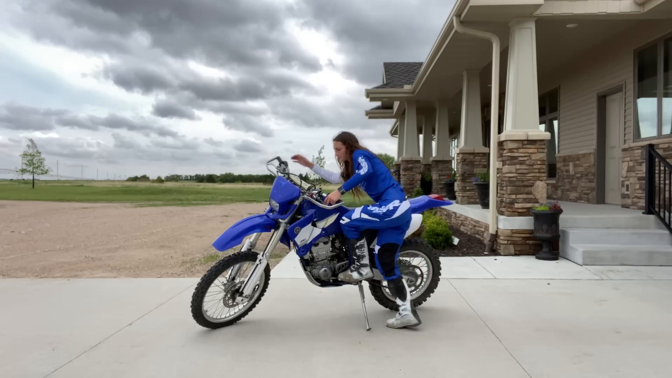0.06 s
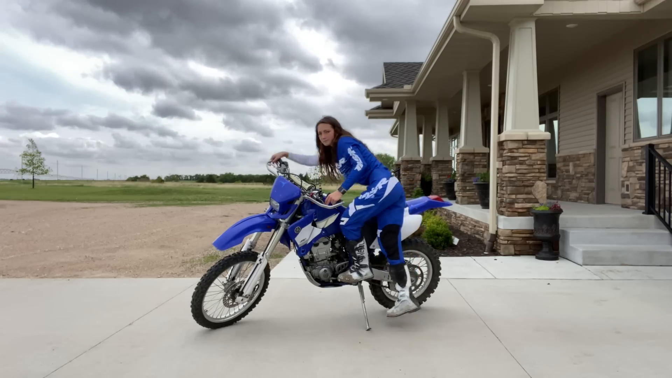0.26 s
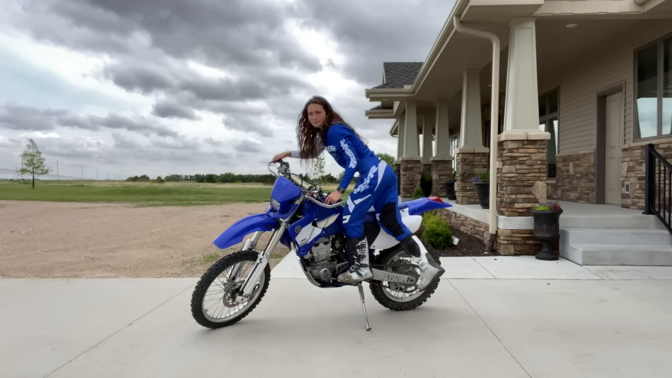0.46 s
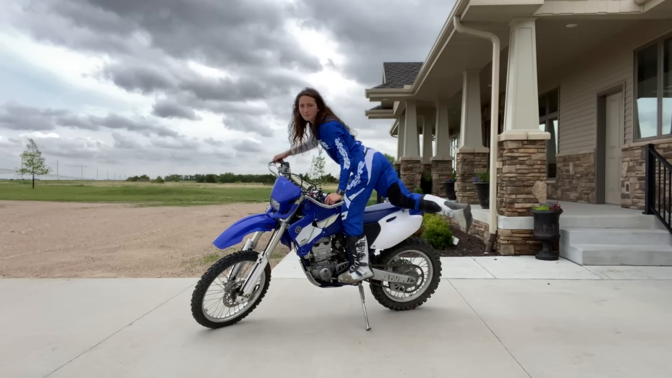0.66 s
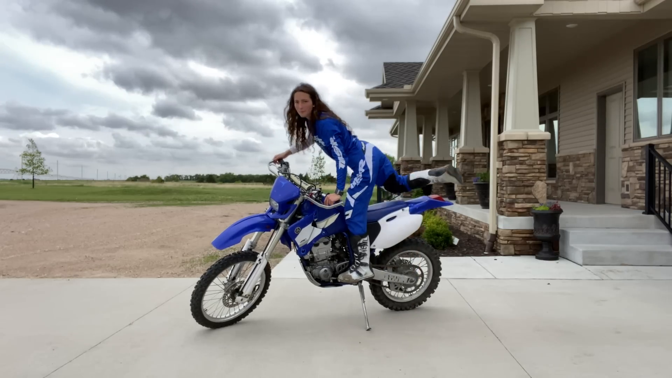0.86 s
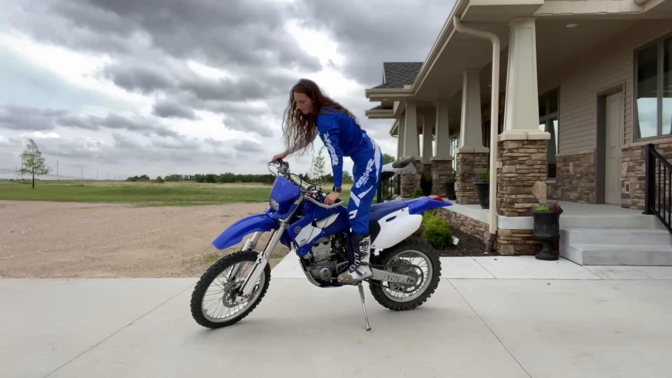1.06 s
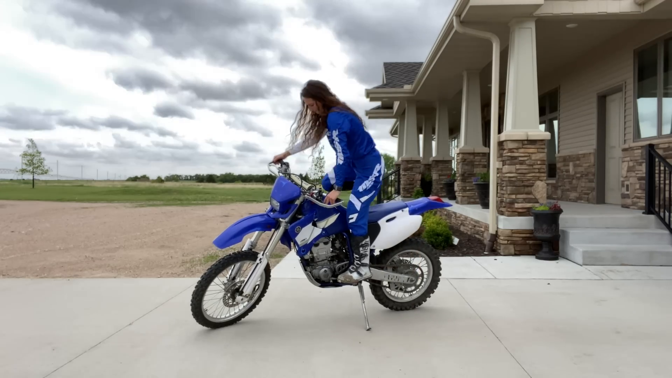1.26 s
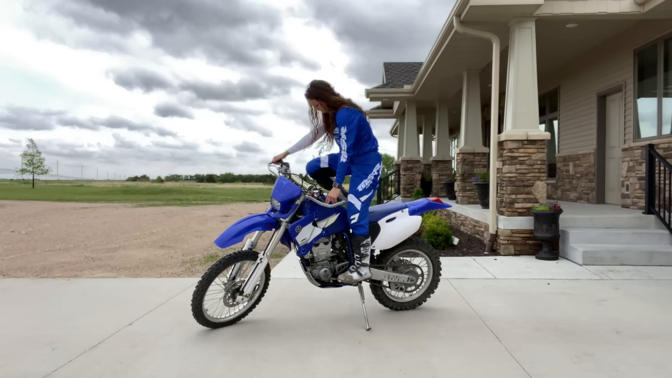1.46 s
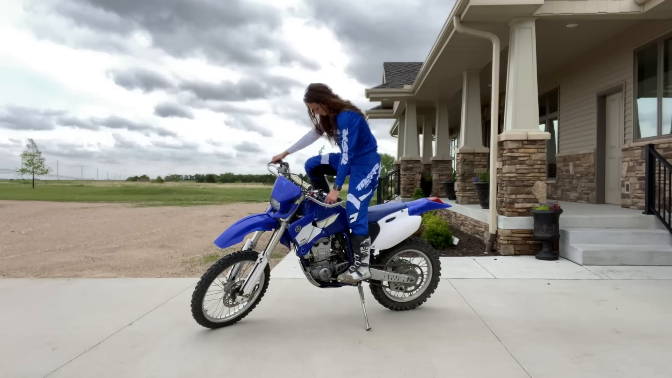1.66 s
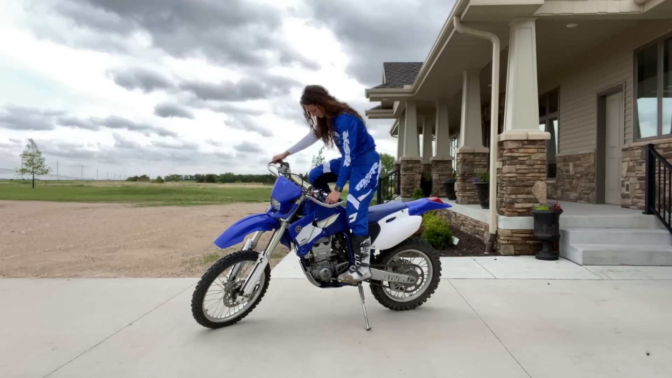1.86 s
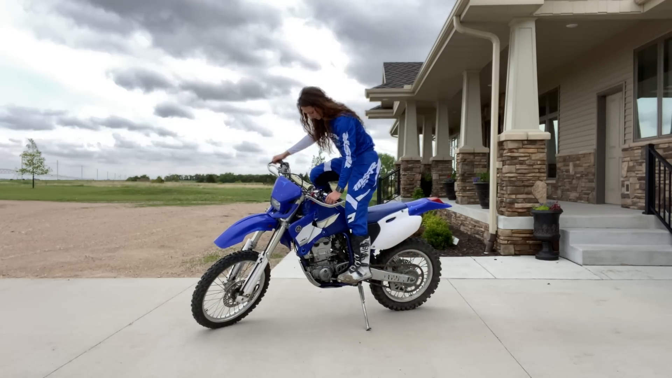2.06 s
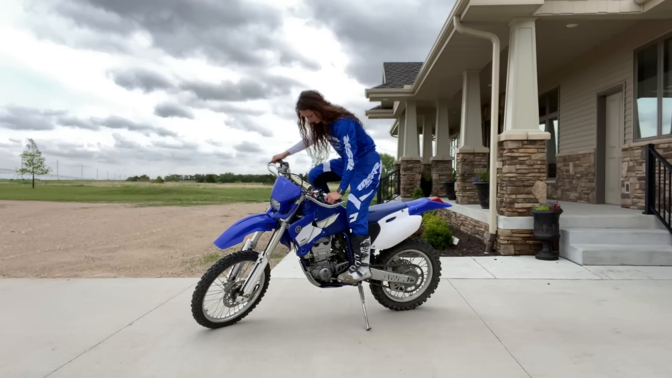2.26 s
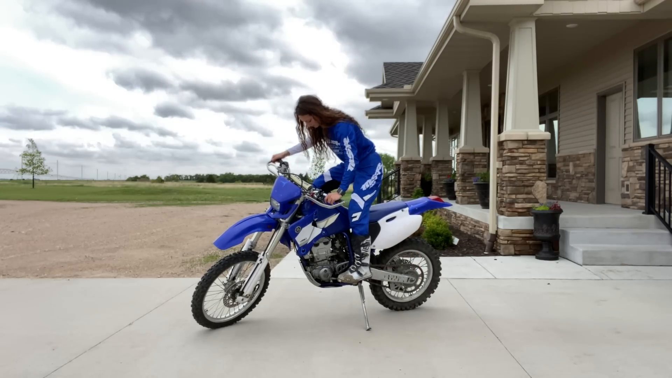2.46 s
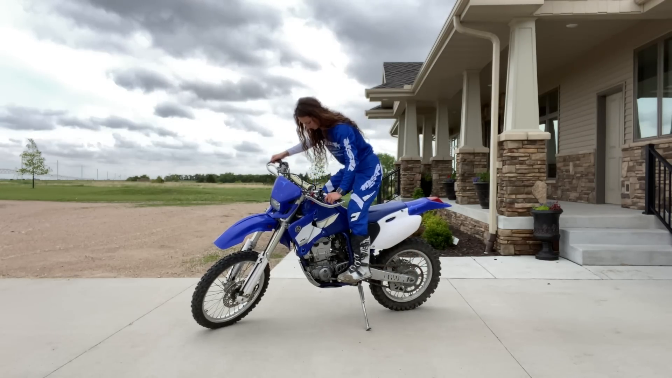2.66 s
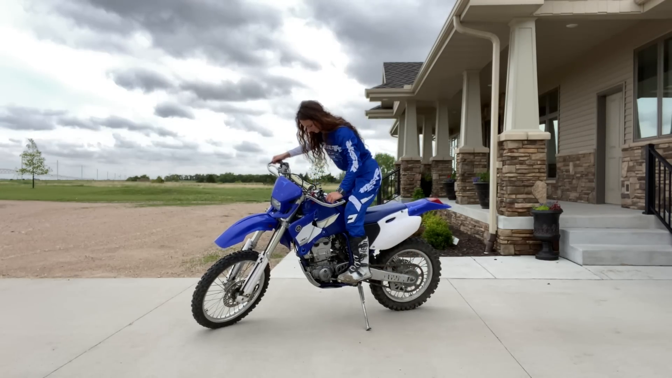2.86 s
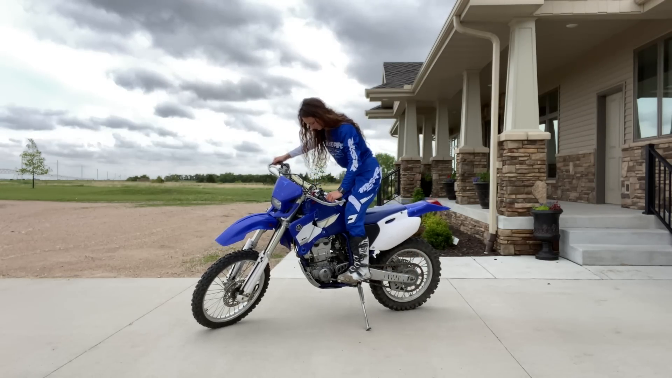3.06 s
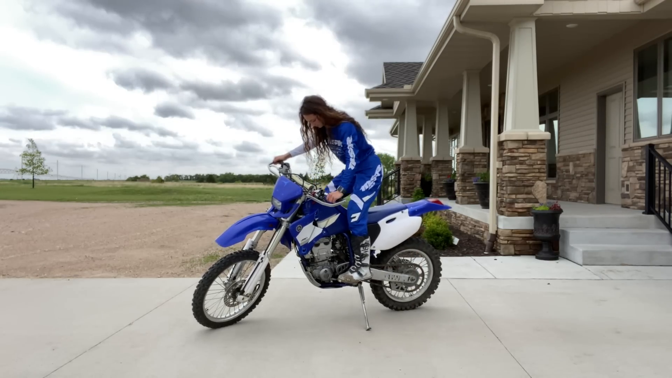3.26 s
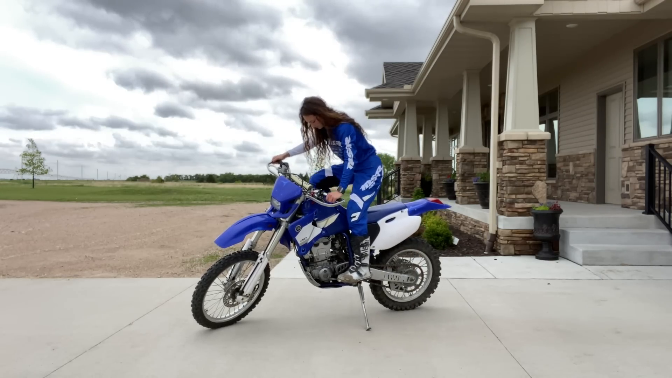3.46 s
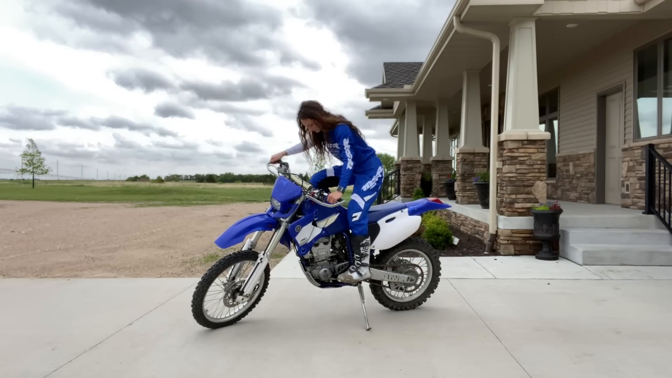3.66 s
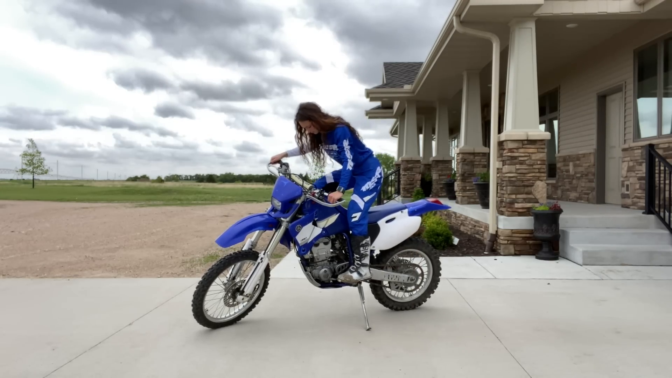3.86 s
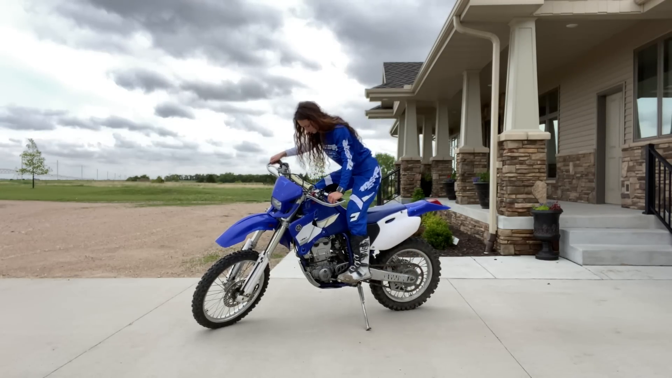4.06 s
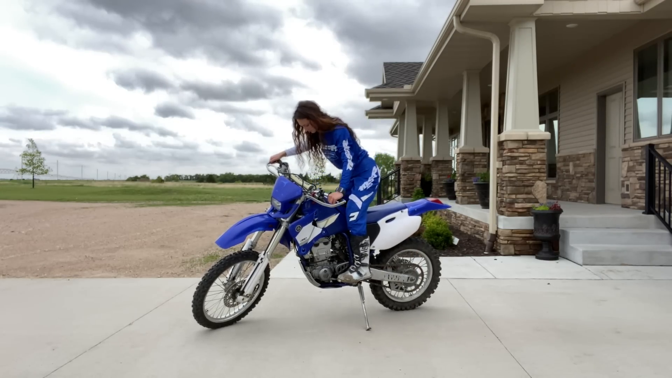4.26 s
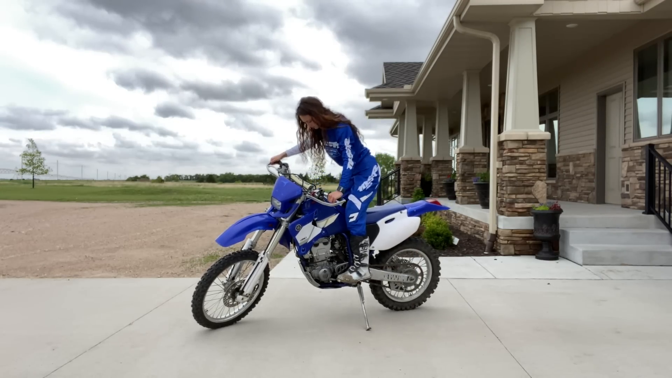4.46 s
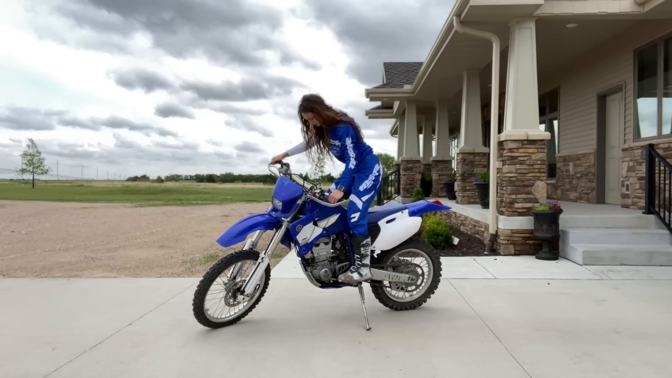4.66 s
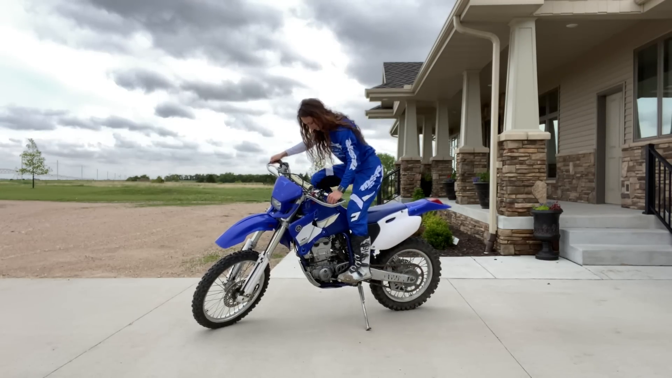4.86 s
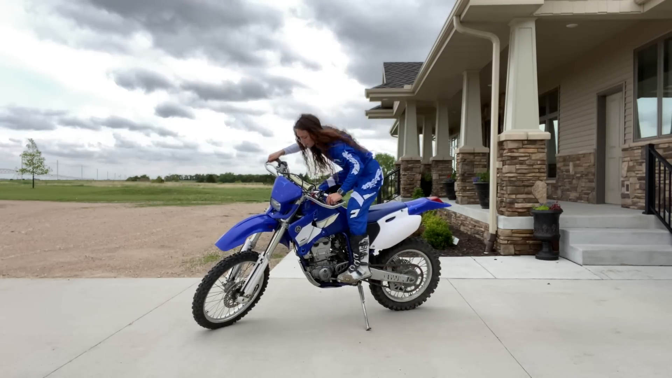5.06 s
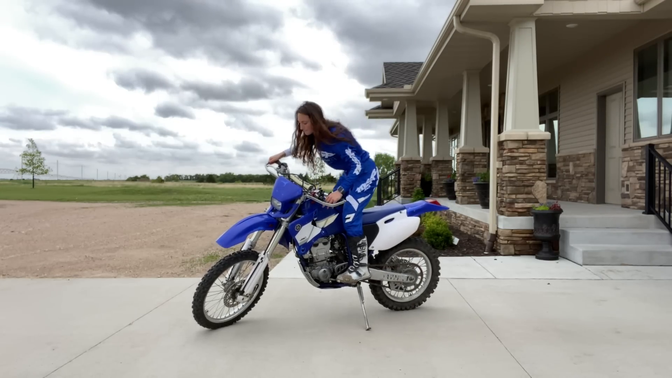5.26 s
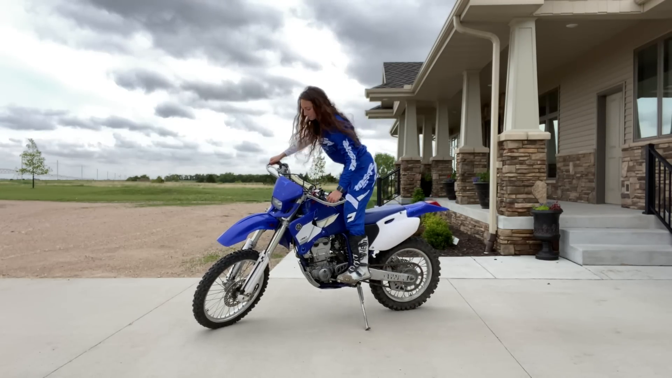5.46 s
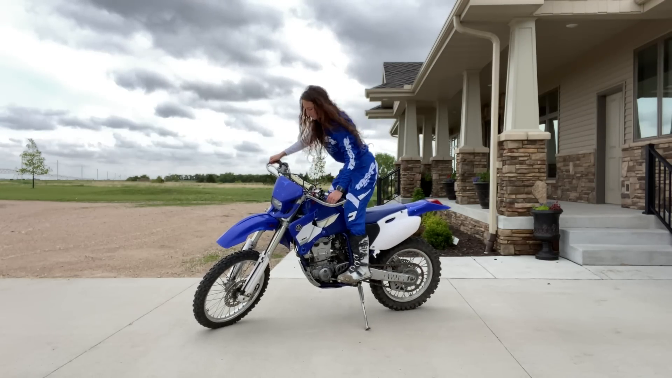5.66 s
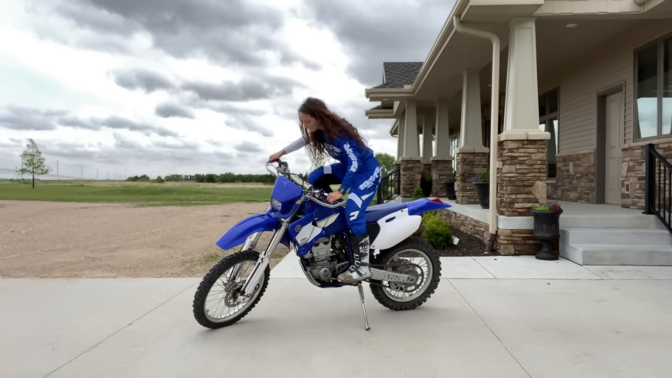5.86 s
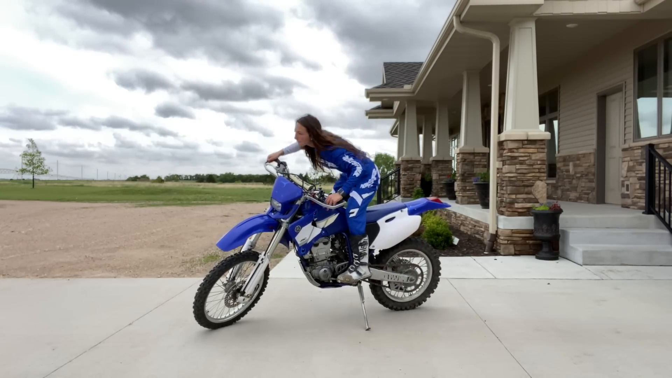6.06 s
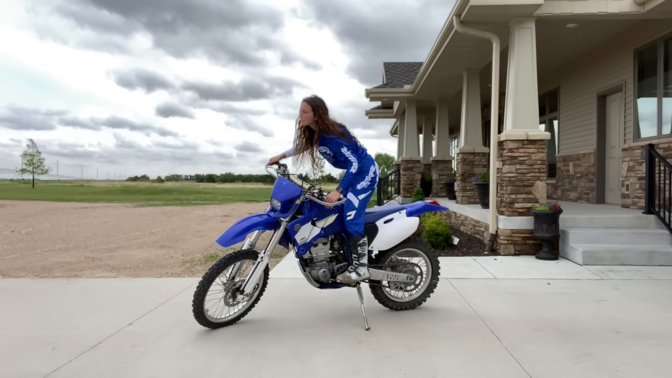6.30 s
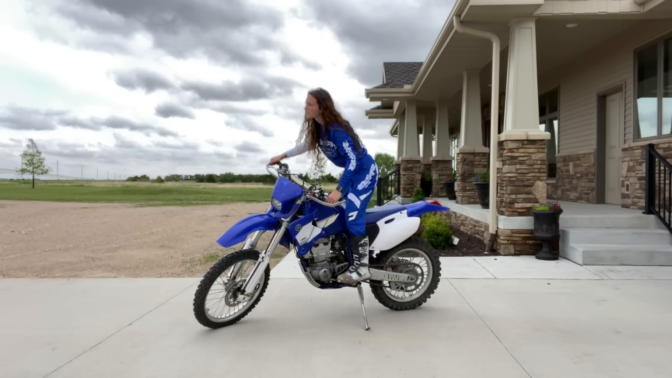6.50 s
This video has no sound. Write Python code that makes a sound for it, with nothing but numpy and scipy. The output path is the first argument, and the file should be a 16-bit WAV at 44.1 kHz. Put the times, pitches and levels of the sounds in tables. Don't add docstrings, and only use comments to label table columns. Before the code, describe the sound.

Quiet open yard by a house, light wind. Small boot ticks, rubbing cloth and dull thuds as someone settles on a motorcycle, then a moderate lever slam with a soft puff. Slow ratchet clicks follow, then a second stamp, a longer run of clicks, and two heavy stamps with booming puffs, bright clanks and rattling. Short echoes return from the wall; the phone microphone rounds the loudest peaks. No ignition.

```python
import sys
import numpy as np
from scipy import signal
from scipy.fft import rfft, irfft, next_fast_len
from scipy.io import wavfile
from scipy.ndimage import uniform_filter1d

SR = 44100
rng = np.random.default_rng(int(sys.argv[2]) if len(sys.argv) > 2 else 0)


def digitize_waveform(pressure):
    field = np.atleast_2d(pressure).T
    bounded = np.clip(field, -1, 1)
    quanta = np.round(bounded * 32767).astype(np.int16)
    wavfile.write(sys.argv[1], SR, quanta)


def gain_from_decibels(decibels):
    exponent = np.asarray(decibels, float) / 20
    return 10 ** exponent


N = 287973
LEAD, SPAN = int(0.033 * SR), int(0.32 * SR)

# t/s, peak/dB, dull part/dB, bright part/dB
STOPS = [
    (2.8418, -15, -8.5, -3.5),
    (4.3129, -18.5, -4.5, 1),
    (5.198, -9.5, -4.5, 0),
    (6.1298, -10.5, -3, 1),
]
# f/Hz, level/dB, t60/s
STOP_MODES = [(512, -7.5, 0.018), (685, -7.5, 0.028), (1200, -7, 0.024), (1390, -8, .025),
              (1600, -8, 0.016), (1933, -5.5, 0.026), (2134, -10, .03), (2550, -2.5, 0.019),
              (3486, -13, 0.022), (4290, -13, 0.0083), (6080, -16, 0.015), (6460, -14, .02),
              (7930, -8, .015), (8180, -7, 0.021)]
# t/s, peak/dB, dull part/dB, bright part/dB
CLANKS = [(2.36, -52.5, 17, -23), (2.3815, -54.5, 17.5, -32), (2.7683, -32.5, 2.5, 11),
          (2.9012, -35.5, 9, 8), (3.6975, -45.5, 9, -29), (4.2547, -31.5, -24, 10), (4.2946, -38, -7, -8),
          (4.3485, -23, -1.5, -9), (5.003, -17, -10, -10), (5.03, -23, -1.5, -8.5), (5.1612, -37, -11, 19),
          (5.2865, -34.5, 7, -8), (5.3167, -30, -27.5, -34), (5.3389, -34, 6, -24.5),
          (5.9569, -22.5, 0, -8.5), (6.048, -43.5, 5, 2), (6.094, -42, -12, 20.5), (6.185, -22, -19, -3.5),
          (6.4093, -45, 6, -25)]
# f/Hz, width/Hz, level/dB
LEVER_MODES = [(522, 50, -12.5), (1183, 110, -10.5), (1610, 64, -26), (2180, 49, -2), (2440, 100, 2),
               (3540, 110, -1), (4100, 56, -2.5), (5400, 120, -9.5), (6230, 74, -29.5), (6550, 30, -13.5),
               (6850, 140, 5.5), (8300, 70, -22.5)]
# f/Hz, level/dB
CRACK = [(180, -30.5), (300, -14.5), (587, -4), (848, -13), (1960, -4.5), (2210, -17.5), (2570, -3),
         (4770, -4), (7890, -6.5), (9330, -6), (10500, -12.5), (13500, -14.5), (16500, -55)]
# t/s, peak/dB, low mode/dB, high mode/dB, click/dB
RATCHET = [(3.1712, -33, -6.5, 2, -1.5), (3.2249, -30.5, -6.5, -2, -8), (3.2817, -32.5, -7.5, 0, -5),
           (3.3431, -36, -2.5, 0, 4), (3.4098, -31.5, -8.5, -3, -3), (3.4804, -31.5, -4.5, -1, -8),
           (4.4317, -33, -2, 5.5, -3), (4.4984, -27, -9, -13, -17), (4.5466, -28, -6.5, -5, -13),
           (4.5923, -31.5, -4.5, 0, -3), (4.6401, -28.5, -7, 0.5, -18), (4.6937, -31, -8.5, -2, -5.5),
           (4.7505, -32, -6.5, -3, -0.5), (4.809, -30, -11, -0.5, -4), (4.8674, -29.5, -8, 0, -2.5),
           (4.9204, -38.5, -4, -2, -10.5), (5.6789, -33.5, -3, 4, -1), (5.731, -29, -7.5, -8, -5),
           (5.7755, -32, -7.5, 0.5, 1), (5.8186, -32.5, -5.5, -8, 3.5), (5.8611, -35, 0, 3.5, 2.5)]
# f/Hz, t60/s
PAWL_RINGS = [(1750, .022), (1160, .026), (2420, .017)]
# t/s, peak/dB, t60/s
PUFFS = [(2.706, -33, 0.25), (2.784, -27.5, 0.44), (2.868, -30.5, 0.13), (4.227, -33, 0.13),
         (4.266, -23, 0.53), (4.279, -36, 0.27), (4.321, -27.5, 0.2), (5.075, -27, 0.066),
         (5.102, -21, 0.088), (5.115, -8, 0.42), (5.173, -27, 0.14), (5.205, -17.5, 0.38), (5.267, -24, .4),
         (6.059, -26, 0.082), (6.073, -14, 0.067), (6.097, -5.5, 0.29), (6.131, -16.5, 0.18),
         (6.186, -23, .3), (6.237, -38.5, 0.24)]
# start/s, fastest/s, coasted out/s, level/dB
STROKES = [
    (2.62, 2.8, 3.05, -48),
    (4.13, 4.27, 4.48, -43.5),
    (4.99, 5.18, 5.31, -39),
    (5.88, 6.11, 6.333, -39),
]
# start/s, middle/s, end/s, level/dB
RETURNS = [
    (3.16, 3.4, 3.53, -59),
    (4.42, 4.6, 4.98, -57.5),
    (5.71, 5.84, 5.9, -54),
]
# start/s, peak/s, end/s, level/dB
CLOTH = [(0, .06, 0.12, -58), (.18, .22, 0.21, -55), (.26, .38, 0.55, -66.5), (.58, .7, .8, -64),
         (.74, .86, 0.96, -65.5), (.93, 1.04, 1.11, -62.5), (1.1, 1.2, 1.34, -67.5),
         (1.28, 1.4, 1.62, -69.5), (2.14, 2.17, 2.24, -65), (5.38, 5.44, 5.56, -62), (5.5, 5.57, 5.67, -66)]
# start/s, peak/s, end/s, level/dB
CREAKS = [(.04, .11, 0.098, -64), (1.09, 1.13, 1.203, -63), (2.28, 2.38, 2.57, -60.5),
          (3.5, 3.56, 3.74, -64), (3.67, 3.73, 3.83, -54.5), (3.99, 4.04, 4.14, -73),
          (4.98, 5.04, 5.13, -48), (5.9, 5.96, 6.26, -48), (6.35, 6.4, 6.54, -64), (3.1, 3.2, 3.33, -62.5),
          (5.5, 5.6, 5.42, -69.5), (5.1, 5.25, 5.4, -49)]
# level/dB, drop to the ends/dB, lag/s
STROKE_MIX = [
    (2, 17.5, 0.013),
    (-0.5, 10.5, 0.0037),
    (-7.5, 21, 0.015),
]
RETURN_MIX = [
    (-1.7, 7.5, 0.011),
    (0.58, 1.1, 0),
    (.5, 6.1, 0.009),
]
CLOTH_MIX = [
    (-14, 5.4, 0.025),
    (-0.5, 6.9, 0),
    (-9.5, 2.6, 0.0096),
]
CREAK_MIX = [
    (9, 22.9, 0.0028),
    (0.5, 14, -0.0065),
    (-14, 17, -0.0011),
]
# t/s, level/dB
RUMBLE = [(0, -58), (.12, -63.5), (.5, -78), (.8, -71), (1.25, -73), (1.75, -64.5), (2.25, -63), (2.5, -53),
          (2.7, -51), (3.1, -55), (3.75, -53), (4.0, -54), (5.0, -55), (5.243, -40.5), (5.65, -59.5),
          (5.98, -42), (6.15, -33.5), (6.53, -58)]
# f/Hz, width/Hz, level/dB
CASES = [(510, 90, -9.5), (1178, 40, -5.5), (1700, 290, -1.5), (2410, 170, -5), (2880, 73, -10)]
# f/Hz, level/dB
HISS = [(1760, -57.5), (3000, -2.5), (3360, -3), (6570, -11.5), (7910, -8), (9060, -14), (9390, -44),
        (10500, -8.5), (13000, -23), (16500, -85.5)]
# t/s, peak/dB, f/Hz, t60/s
PINGS = [(.052, -49, 1240, .03), (.066, -57, 1314, .02), (.098, -51.5, 330, .05), (.34, -64, 1200, .03),
         (.36, -62, 2800, .03), (2.358, -39, 1170, 0.047), (2.378, -39, 1150, 0.049),
         (2.42, -45, 1200, 0.038), (3.17, -45, 199, 0.09), (4.944, -42, 700, 0.037), (2.39, -45, 280, .08),
         (2.43, -47, 418, .06), (3.555, -47.5, 700, .05), (3.7, -44, 650, .04), (3.735, -50, 2400, .03),
         (4.03, -49, 1004, 0.094), (5.05, -32, 3130, 0.033), (5.33, -40, 2990, .06),
         (5.28, -34.5, 298, .08), (5.06, -34, 330, .06), (4.056, -50, 1450, .04), (4.183, -44, 1600, .03),
         (4.205, -39, 1200, .06), (4.22, -41, 1800, .03), (4.252, -43, 1640, .03), (2.862, -36, 560, .05),
         (5.028, -24.5, 1190, .04), (5.044, -30, 1100, .03), (5.054, -35.5, 1150, .03),
         (5.07, -41, 1190, .04), (5.096, -36.5, 1100, .04), (5.14, -37.5, 1190, .06),
         (5.215, -23.5, 563, .05), (5.235, -31, 1070, .03), (5.315, -25, 1750, .04),
         (5.317, -35, 1150, .04), (5.338, -32, 1760, .04), (5.934, -38, 294, .05),
         (5.955, -24.5, 1203, .04), (5.975, -37, 1815, .04), (6.047, -35, 1150, .06),
         (6.075, -42, 1750, .04), (6.091, -36, 1150, .05), (6.147, -25.5, 550, .05),
         (6.184, -29.5, 1660, .03), (6.195, -29, 2550, .02), (6.21, -28, 1150, .04),
         (6.243, -35.5, 1200, .04), (6.252, -40, 1700, .03)]
# f/Hz, level/dB, t60/s
FRAME = [(1163, -13.5, 0.078), (1455, -8, 0.45), (1680, -14, 0.82), (1760, -8, .2), (2310, -16.5, 0.22),
         (2546, -22, 0.25), (2789, -20, .4), (2880, -14.5, 0.48), (3120, -18, 0.27), (3289, -17, 0.71)]
# t/s, peak/dB, f/Hz, t60/s
THUDS = [(0.097, -48.5, 243, 0.15), (0.429, -50, 68, 0.15), (0.698, -48, 116, 0.14), (0.779, -45, 54, 0.14),
         (0.974, -60.5, 53.8, 0.11), (1.115, -41, 191, 0.095), (1.454, -48.5, 64, 0.23),
         (1.546, -51, 90.4, 0.49), (2.012, -39, 72, 0.2), (2.108, -47, 55, .15), (2.263, -48.5, 64, 0.15),
         (2.406, -37.5, 65, 0.37), (2.497, -36.5, 65.6, 0.26), (3.171, -41, 53, 0.18),
         (3.279, -49, 109, 0.12), (3.33, -43.5, 49.7, 0.24), (3.705, -37, 159.6, 0.091),
         (3.729, -37, 180, 0.11), (3.852, -36, 66.1, 0.24), (3.911, -38.5, 67.3, 0.08),
         (3.994, -43.5, 73.3, 0.12), (4.2, -33, 136, 0.11), (5.021, -26.5, 171.3, 0.17),
         (5.049, -28, 195.6, 0.08), (5.692, -46.5, 87, 0.087), (5.943, -28.5, 243, 0.24),
         (5.989, -17.5, 189, 0.18), (6.003, -24, 187, 0.23), (6.039, -15.5, 133, 0.4),
         (6.41, -38.5, 218, 0.166)]
# t/s, length/s, level/dB, main f/Hz, second f/Hz, second level/dB
SCRAPES = [(2.14, 0.064, -53.5, 2315, 1450, -11.5), (2.367, 0.015, -60, 1150, 1700, 1),
           (2.415, 0.0083, -54.5, 1150, 1700, 0), (4.006, 0.058, -60, 1000, 1470, 3),
           (5.02, 0.03, -40, 1150, 910, -9), (5.292, 0.035, -39, 1740, 1150, 1.5),
           (5.305, 0.045, -50.5, 3040, 3050, -3), (5.936, 0.048, -38, 1150, 1460, -3.5),
           (6.486, 0.028, -66.5, 3600, 3440, 4.5)]
# t/s, peak/dB, brightness/dB
TICKS = [(0.0179, -61, 21.5), (0.0558, -58, 21), (0.2026, -39.5, 20), (0.22, -49.5, 25), (0.4235, -53, 4),
         (0.6594, -51, 5), (0.7055, -51.5, -1), (0.762, -47, -9), (0.7995, -47.5, 1), (0.83, -48, 4),
         (0.8814, -45.5, 4), (0.9444, -55, 14), (0.9998, -46, 6), (1.0456, -47, 7), (1.126, -50.5, -42),
         (1.2126, -51.5, 7), (1.282, -56, -14), (1.5548, -56, 7), (1.585, -60, -5), (1.6486, -55, 0),
         (1.723, -53.5, -2), (1.8923, -52, -8), (1.983, -62.5, 0), (2.3062, -41, -4), (2.6569, -48, -41),
         (3.06, -50.5, 10), (3.135, -46.5, -35), (3.5474, -44, -12), (3.6399, -40.5, -6.5),
         (4.9447, -40, -32)]
# f/Hz, width/Hz, level/dB
TICK_MODES = [(950, 43, -31), (1150, 48, -1), (1766, 86, -3), (2480, 150, 2), (3837, 66, -11),
              (4220, 82, -2), (5370, 93, -7.5), (7060, 130, -23.5), (7060, 72, -27), (7740, 450, -22)]
# f/Hz, level/dB
WIND = [(24, -38.5), (40, 0), (99, -2), (646, -33), (1120, -23), (1950, -38.5), (2380, -29.5),
        (3650, -43.5), (8130, -42), (9450, -58.5), (11300, -51.5), (13100, -49.5), (16000, -66.5)]
# f/Hz, phase/rad
PORT_PHASE = [(0, 1), (150, 0), (780, -2), (1120, 0.5), (3270, 1.5), (4050, 1.5), (6630, 1.79), (7580, 5),
              (8270, 4.5), (9040, 4), (10200, 7), (11200, -1.2), (12900, 0), (13800, 2)]
# f/Hz, level/dB
PORT_BALANCE = [(60, 0), (110, 1), (200, 0.5), (380, -1), (700, -1), (1290, 0.5), (2380, -1), (4400, 1),
                (8120, -2), (15000, 1)]
# f/Hz, level/dB
MID_DIP = [(8800, 0), (9150, -20.5), (10250, -14), (10500, -0.5), (13600, -2), (14200, -1.5), (16300, 0),
           (16900, -32.5)]


def unit(x):
    return x / np.sqrt(np.mean(x ** 2))


def on_log(table, hz):
    f, v = np.transpose(table)
    return np.interp(np.log(hz + 1), np.log(f + 1), v)


def colour(x, table):
    n = next_fast_len(x.shape[-1], True)
    gain = gain_from_decibels(on_log(table, np.fft.rfftfreq(n, 1 / SR)))
    return irfft(rfft(x, n) * gain, n)[..., :x.shape[-1]]


def band(x, lo_hz, hi_hz):
    return signal.sosfilt(signal.butter(2, [lo_hz, hi_hz], "band", fs=SR, output="sos"), x)


def ring(x, hz, t60):
    pole = np.exp(2j * np.pi * hz / SR - np.log(1000) / (t60 * SR))
    return signal.lfilter([1], [1, -pole], x).imag


def flicker(rate, db):
    k = int(SR / rate)
    steps = np.repeat(rng.standard_normal(N // k + 1), k)
    return gain_from_decibels(db * 1.86 * uniform_filter1d(steps, k)[:N])


def add(track, s, x):
    i = int(s * SR)
    track[i:i + len(x)] += x[:len(track) - i]


def strike(hz, t60, cycles, phase):
    t = np.arange(4096) / SR
    swell = (1 - np.exp(-t * hz / cycles)) ** 2 * gain_from_decibels(-60 * t / t60)
    return swell / swell.max() * np.sin(2 * np.pi * (hz * t + phase))


def crack(rise_s, fall_s, lo_hz):
    t = np.arange(4096) / SR
    spray = (1 - np.exp(-t / rise_s)) * np.exp(-t / fall_s) * rng.standard_normal(len(t))
    x = band(colour(spray, CRACK), lo_hz, 16500)
    return x / np.abs(x).max()


def stops():
    out = np.zeros(N)
    for s, db, dull_db, bright_db in STOPS:
        luck = rng.standard_normal((len(STOP_MODES), 3))
        body = 0
        for (hz, mode_db, t60), (a, b, phase) in zip(STOP_MODES, luck):
            tone_db = dull_db if hz < 1500 else bright_db if hz > 3000 else 0
            body = body + gain_from_decibels(mode_db + tone_db + 1.8 * a) * strike(hz * (1 + 0.0072 * b), t60, 3.3, phase)
        edge = gain_from_decibels(bright_db) * 2 * crack(0.00048, 0.0046, 820)
        add(out, s - 0.0012, gain_from_decibels(db) * (body + edge))
    return out


def knocks(events, modes, rise_s, rattle_s, t60, crack_db, loose):
    out, t = np.zeros(N), np.arange(4096) / SR
    contact = (1 - np.exp(-t / rise_s)) ** 2 * np.exp(-t / rattle_s)
    for s, db, dull_db, bright_db in events:
        touch = contact * rng.standard_normal((2, len(t)))
        luck = rng.standard_normal((len(modes), 2))
        body = 0
        for (hz, _, mode_db), (a, b) in zip(modes, luck):
            body = body + gain_from_decibels(mode_db + 6.9 * loose * a) * ring(touch[0], hz * (1 + 0.11 * loose * b), t60)
        x = unit(body) + gain_from_decibels(crack_db) * unit(colour(touch[1], CRACK))
        parts = [-band(x, 360, 1300), band(x, 910, 3370), -band(x, 6300, 13000)]
        levels_db = (dull_db, 0, bright_db)
        add(out, s - rise_s, sum(gain_from_decibels(db + g) * p / np.abs(p).max() for p, g in zip(parts, levels_db)))
    return out


def clanks():
    return knocks(CLANKS, LEVER_MODES, 0.0018, 0.0041, 0.0048, crack_db=12, loose=0.62)


def ratchet():
    out = np.zeros(N)
    for s, db, low_db, high_db, click_db in RATCHET:
        luck = rng.standard_normal((len(PAWL_RINGS), 4))
        body = 0
        for (hz, t60), mode_db, (a, b, c, d) in zip(PAWL_RINGS, (0, low_db, high_db), luck):
            first = strike(hz * (1 + 0.043 * a), t60, 0.8, b)
            partner = 0.72 * strike(hz * (1 + 0.139 * c), t60, 1.9, d)
            body = body + gain_from_decibels(mode_db) * (first + partner)
        click = gain_from_decibels(click_db + 6.5) * crack(0.0004, 0.0058, 2900)
        clack = gain_from_decibels(4.5) * crack(0.0006, 0.0063, 450)
        add(out, s - 0.001, gain_from_decibels(db - 2) * (body + click + clack))
    return out


def exhaust():
    start_hz, pipe_hz, second_hz, third_hz = 84.5, 58.5, 122, 197.5
    out, t = np.zeros(N), np.arange(-LEAD, SPAN) / SR
    after = np.maximum(t, 0)
    before = t - after
    sag = (start_hz - pipe_hz) * 0.0015 * (1 - np.exp(-after / 0.012))
    wave = np.cos(2 * np.pi * (start_hz * before + pipe_hz * after + sag))
    wave = wave + gain_from_decibels(-9) * np.cos(2 * np.pi * second_hz * t)
    wave = wave + gain_from_decibels(-12) * np.cos(2 * np.pi * third_hz * t)
    for s, db, t60 in PUFFS:
        decay = 0.97 * gain_from_decibels(-60 * after / t60) + 0.16 * np.exp(-after / 0.006)
        swell = np.exp(-(before / 0.0089) ** 2) * decay
        add(out, s + t[0], -gain_from_decibels(db) * swell * wave / np.abs(wave).max())
    return out


def effort(motions, mix):
    let_go_db_per_s = 25 / 0.091
    t, out = np.arange(N) / SR, np.zeros((len(mix), N))
    for start, peak, end, db in motions:
        for power, (rel_db, drop_db, lag_s) in zip(out, mix):
            shape = np.interp(t - lag_s, [start, peak, end], [-drop_db, 0, -drop_db])
            outside = np.maximum(start - t + lag_s, 0) + np.maximum(t - lag_s - end, 0)
            level_db = db + rel_db + shape - let_go_db_per_s * outside
            power += gain_from_decibels(2 * np.maximum(level_db, -150))
    return out


def grit():
    return flicker(220, 2) * flicker(30, 1.1)


def cranking():
    rumble_gain = gain_from_decibels(np.interp(np.arange(N) / SR, *np.transpose(RUMBLE)))
    kinds = (STROKES, STROKE_MIX), (RETURNS, RETURN_MIX), (CLOTH, CLOTH_MIX), (CREAKS, CREAK_MIX)
    knock, whirr, rub = np.sqrt(sum(effort(*kind) for kind in kinds))
    noise = rng.standard_normal((4, N))
    teeth = noise[2] * grit()
    cases = sum(gain_from_decibels(db) * unit(ring(teeth, hz, 1.25 / width)) for hz, width, db in CASES)
    gears = unit(unit(cases) + gain_from_decibels(-4.5) * unit(band(teeth, 860, 3600)))
    rumble = flicker(14, 1.2) * unit(band(band(noise[0], 35, 140), 46, 220))
    dull = unit(band(noise[1], 150, 327)) - gain_from_decibels(-2) * unit(band(noise[1], 380, 950))
    dull = flicker(60, 2.19) * dull
    hiss = unit(colour(noise[3] * grit(), HISS))
    return rumble_gain * rumble + knock * dull + gain_from_decibels(0.5) * whirr * gears + gain_from_decibels(6.5) * rub * hiss


def pings():
    out = np.zeros(N)
    for s, db, hz, t60 in PINGS:
        add(out, s, gain_from_decibels(db) * strike(hz, t60, 1.2, rng.random()))
    return out


def frame_ring():
    out, t = np.zeros(N), np.arange(SR // 2) / SR
    shake = np.exp(-t / 0.19) * rng.standard_normal((len(FRAME), len(t)))
    song = 0
    for (hz, db, t60), x in zip(FRAME, shake):
        song = song + gain_from_decibels(db) * flicker(11, 1.2)[:len(t)] * ring(x, hz, t60)
    add(out, 5.3, gain_from_decibels(-77.5) * song)
    return out


def thuds():
    out, t = np.zeros(N), np.arange(SPAN) / SR
    for s, db, hz, t60 in THUDS:
        rough = unit(band(rng.standard_normal(SPAN), 0.88 * hz, 1.51 * hz))
        swell = (1 - np.exp(-t / 0.011)) * gain_from_decibels(-60 * t / t60)
        x = swell * (np.sin(2 * np.pi * hz * t) + 0.33 * rough)
        add(out, s, -gain_from_decibels(db - 2) * x / np.abs(x).max())
    return out


def scrapes():
    out, t = np.zeros(N), np.arange(SPAN) / SR
    grain = flicker(110, 0.55)[:SPAN]
    for s, length, db, hz, second_hz, second_db in SCRAPES:
        friction = rng.standard_normal(SPAN) * grain
        x = unit(ring(friction, hz, 0.022))
        x = x + gain_from_decibels(second_db) * unit(ring(friction, second_hz, 0.0085))
        x = x + gain_from_decibels(-5) * unit(band(friction, 3600, 8700))
        fade = np.minimum(t / 0.005, 1) * gain_from_decibels(-np.maximum(t - length, 0) / 0.00095)
        add(out, s, gain_from_decibels(db) * band(x, 800, 8100) * fade)
    return out


def ticks():
    events = [(s, db, -6.5 - 0.3 * edge_db, -6.5 + edge_db) for s, db, edge_db in TICKS]
    return knocks(events, TICK_MODES, 0.00057, 0.0041, 0.0038, crack_db=0.5, loose=2.4)


def yard(x):
    wall_s, dull_t60, bright_t60 = 0.016, 0.25, 0.27
    t = np.arange(SPAN) / SR
    late = np.maximum(t - wall_s, 0)
    noise = rng.standard_normal((3, SPAN))
    slap = (late > 0) * np.exp(-late / 0.004) * (noise[2] - 0.43 * band(noise[2], 800, 2300))
    dull = gain_from_decibels(-60 * late / dull_t60) * band(noise[:2], 250, 2200)
    bright = gain_from_decibels(-60 * late / bright_t60) * band(noise[:2], 4300, 18000)
    tail = (1 - np.exp(-late / 0.00072)) * (dull - bright)
    near = signal.oaconvolve(x, slap / np.linalg.norm(slap))[:N]
    far = signal.oaconvolve(x[None], tail / np.linalg.norm(tail[0]), axes=1)[:, :N]
    return gain_from_decibels(-8.5) * near, gain_from_decibels(-11) * far


def wind():
    common, own = rng.standard_normal(N), rng.standard_normal((2, N))
    return gain_from_decibels(-64) * flicker(1.7, 1.5) * unit(colour(common + 0.98 * own, WIND))


def ports(x):
    n = next_fast_len(N, True)
    hz = np.fft.rfftfreq(n, 1 / SR)
    lead = np.exp(0.5j * np.interp(hz, *np.transpose(PORT_PHASE)))
    turn = lead * gain_from_decibels(on_log(PORT_BALANCE, hz) / 2)
    return irfft(rfft(x, n) * np.array([turn, 1 / turn]), n)[:, :N]


def scene():
    metal = clanks() + stops() + ratchet() + ticks()
    slap, scatter = yard(metal)
    air = signal.ellip(8, 0.5, 50, 13900, fs=SR, output="sos")
    motion = signal.sosfilt(air, cranking() + scrapes()) + pings()
    spread = gain_from_decibels(-7.5) * np.array([np.roll(motion, 900), np.roll(motion, 1300)])
    direct = ports(metal + slap + frame_ring() + exhaust() + thuds() + motion)
    return direct + spread + signal.sosfilt(air, scatter + wind())


def low_pass(x):
    return signal.sosfilt(signal.butter(12, 16800, fs=SR, output="sos"), x)


def record(dry):
    wet = np.tanh(1.113 * dry) / 1.18
    mid = wet.mean(axis=0)
    mix = wet - mid + colour(mid, MID_DIP)
    return low_pass(mix)


dry = scene()
out = record(dry)
digitize_waveform(out)
```